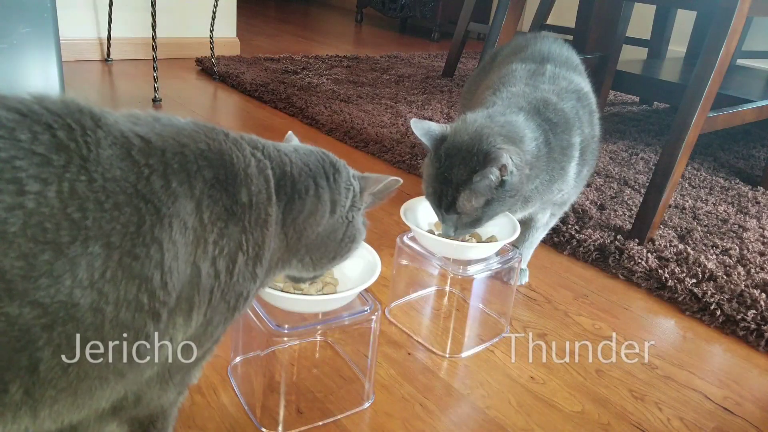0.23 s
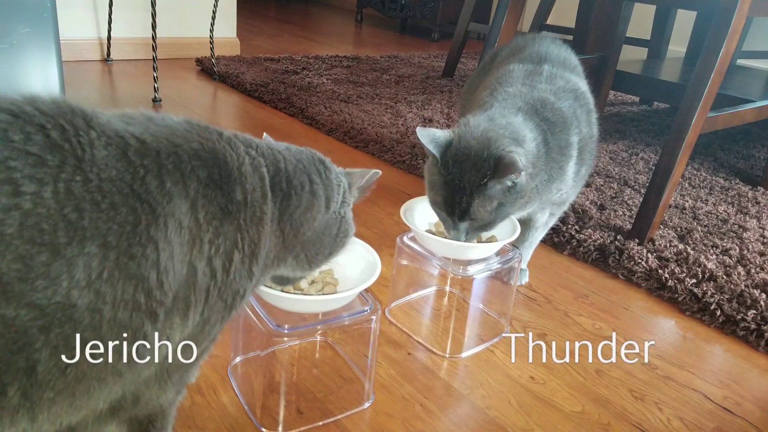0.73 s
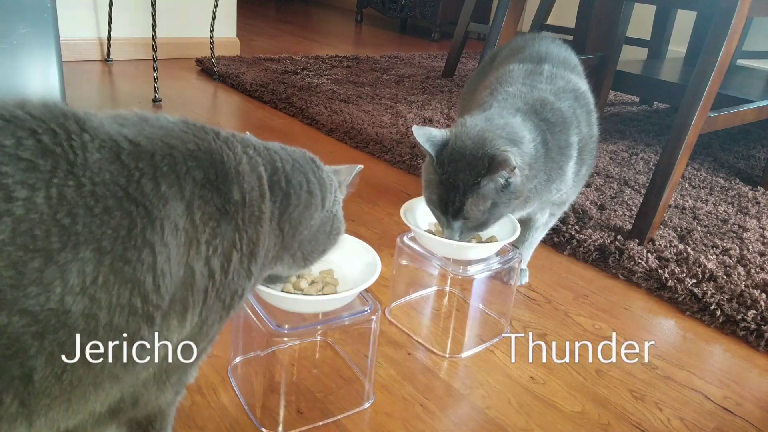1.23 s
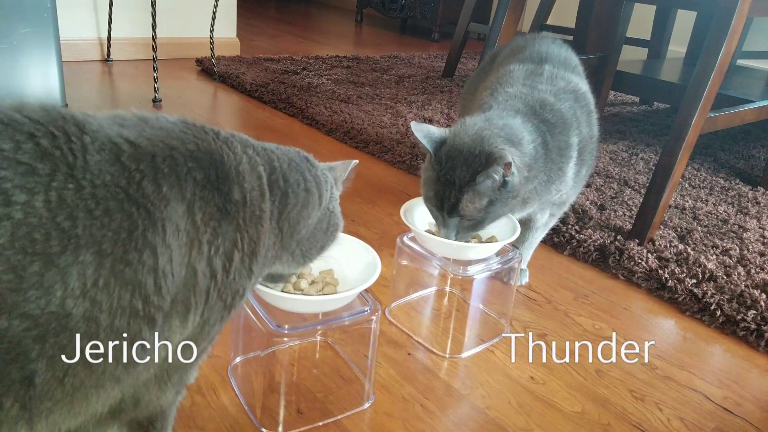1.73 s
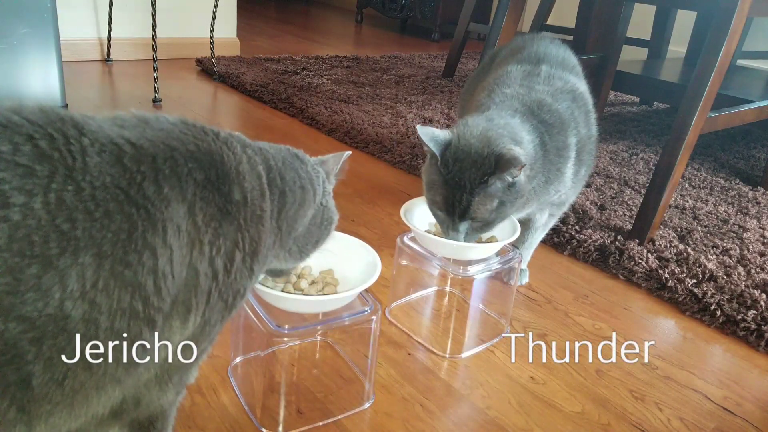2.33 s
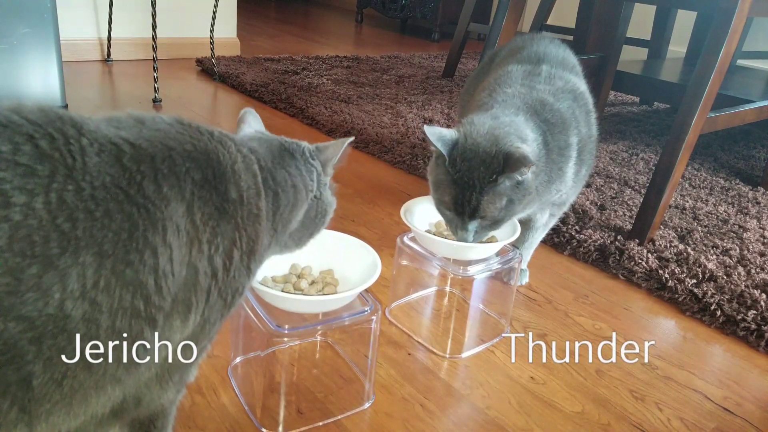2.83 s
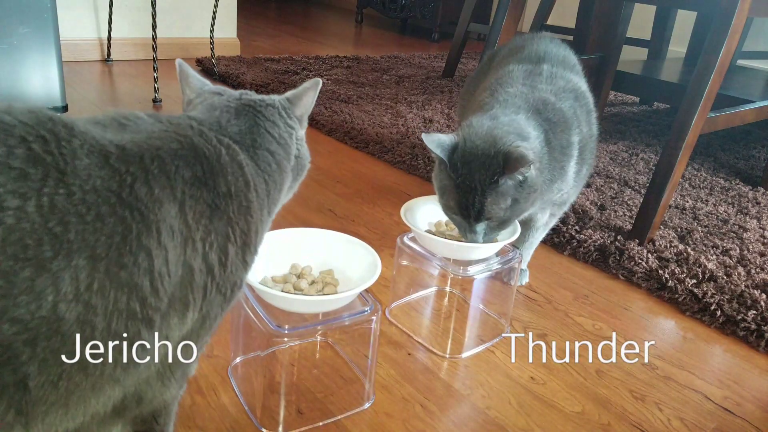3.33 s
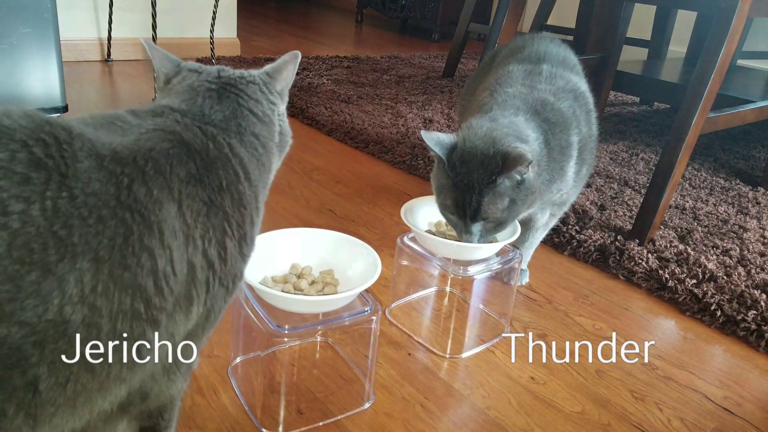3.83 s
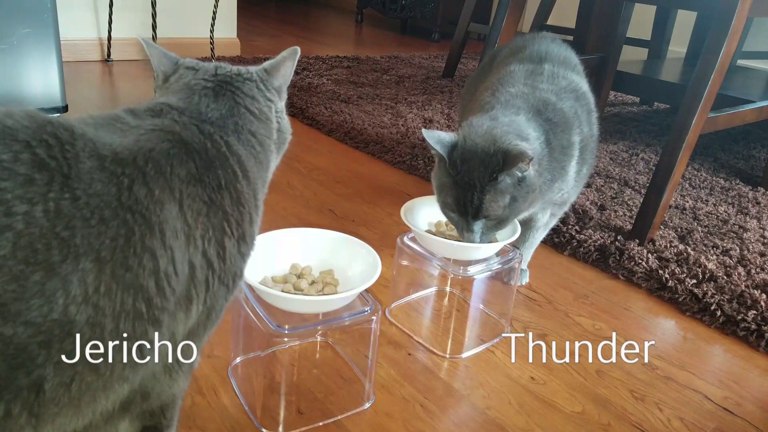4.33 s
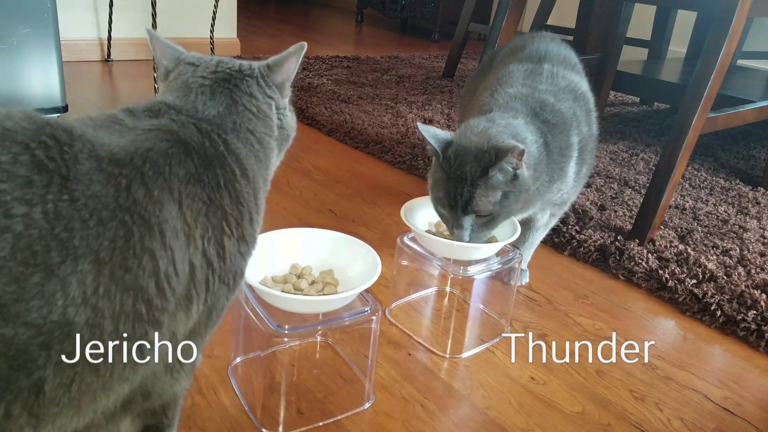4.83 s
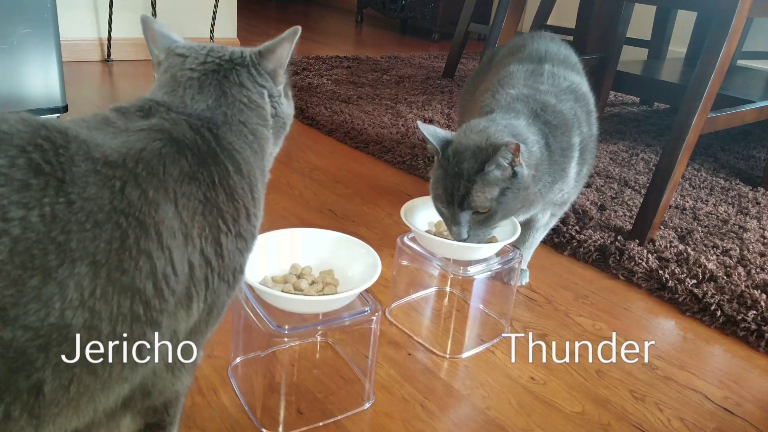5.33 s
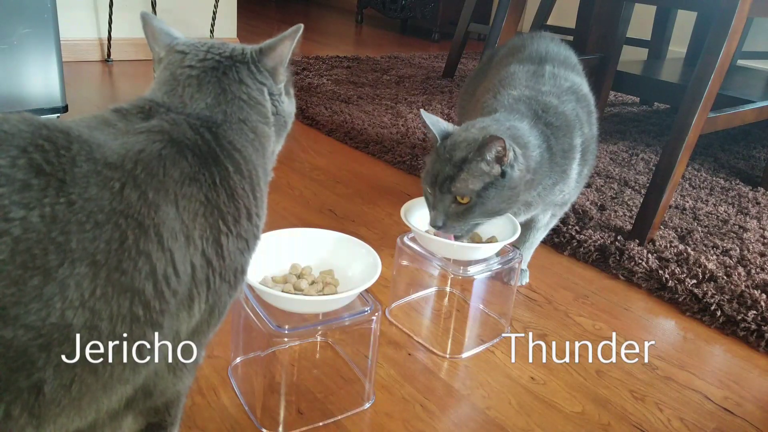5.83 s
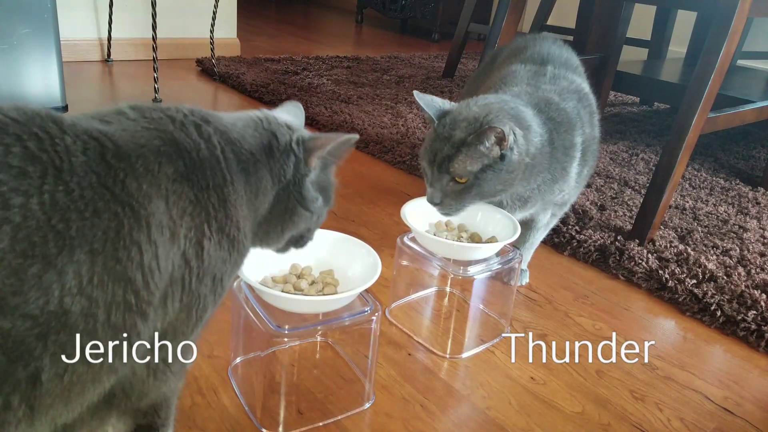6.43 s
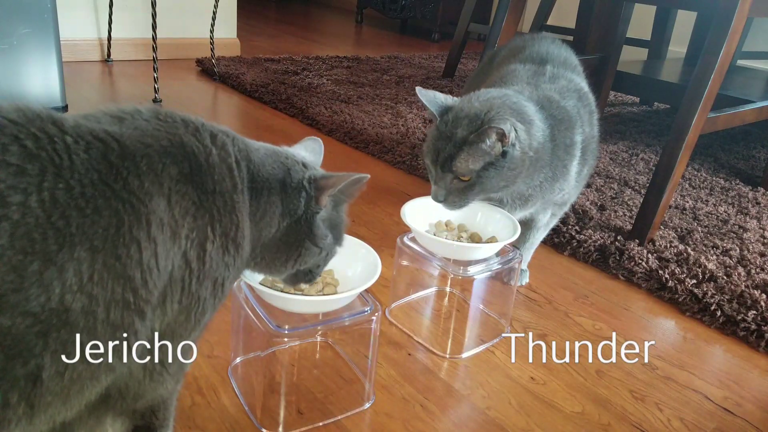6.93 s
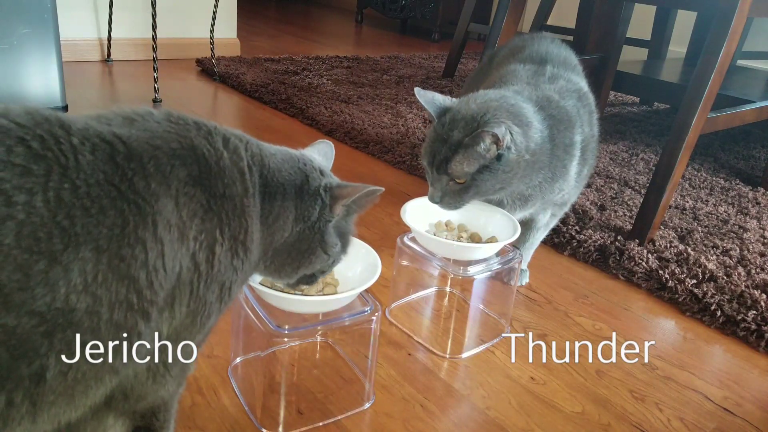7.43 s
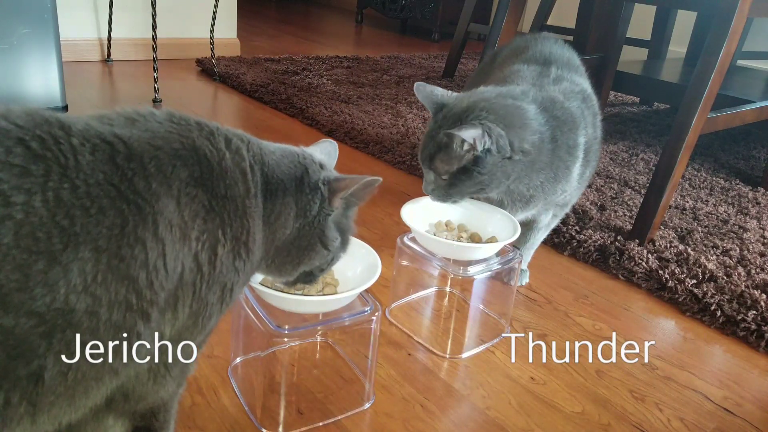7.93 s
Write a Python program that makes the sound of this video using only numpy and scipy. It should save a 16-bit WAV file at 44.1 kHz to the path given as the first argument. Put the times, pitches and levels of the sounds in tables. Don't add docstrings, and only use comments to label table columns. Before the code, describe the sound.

Quick irregular wet clicks of cats chewing close by, over a steady refrigerator hum and the faint ringing tick-tock of a clock.

```python
import sys
import numpy as np
from scipy import signal
from scipy.fft import irfft
from scipy.io import wavfile
from scipy.ndimage import uniform_filter1d

SR = 44100
rng = np.random.default_rng(int(sys.argv[2]) if len(sys.argv) > 2 else 0)


def file_out(sig):
    cols = np.atleast_2d(sig).T
    lim = np.clip(cols, -1, 1)
    pcm = np.round(lim * 32767).astype(np.int16)
    wavfile.write(sys.argv[1], SR, pcm)


def natural_amplitude(level_db):
    exponent = np.asarray(level_db, float) / 20
    return 10 ** exponent


N = 361179
T = np.arange(N) / SR


def evened(x):
    return x / np.sqrt(np.mean(x ** 2) + 1e-20)


def read(points, hz):
    f, value = np.transpose(points)
    return np.interp(np.log(hz + 1), np.log(f + 1), value)


def add(mix, s, sound):
    part = mix[:, round(s * SR):][:, :sound.shape[1]]
    part += sound[:, :part.shape[1]]


def panned(sound, lean_db):
    return sound * natural_amplitude([[lean_db / 2], [-lean_db / 2]])


def resonances(x, table):
    out = 0
    for hz, width, db in table:
        out = out + natural_amplitude(db) * signal.lfilter(*signal.iirpeak(hz, hz / width, SR), x)
    return out


# frequency in Hz, left-right correlation.
LIKENESS = [(60, 0.99), (130, 0.98), (290, 0.89), (630, 0.6), (1380, -0.06), (3030, 0.098), (6630, 0.016),
            (14500, 0.091)]
# frequency in Hz, left-right level in dB.
BALANCE = [(35, -2.3), (110, -5.5), (200, -0.5), (370, 0), (690, -1.5), (1270, 0.0), (2330, 0), (4290, 1),
           (7900, 2), (14500, 1.5)]
LAG_S = -0.00013


def noise(spectrum_db, size, patchy_db):
    hop, hz = size // 4, np.fft.rfftfreq(size, 1 / SR)
    a, b, c, d, patches = rng.standard_normal((N // hop + 5, len(hz), 5)).T
    patches = uniform_filter1d(patches, size=size // 80, axis=0)
    patches = evened(uniform_filter1d(patches, size=8192 // size, axis=1))
    same = np.clip(read(LIKENESS, hz), -1, 1)[:, None]
    left = a + 1j * b
    right = same * left + np.sqrt(1 - same ** 2) * (c + 1j * d)
    right = right * np.exp(2j * np.pi * hz * LAG_S)[:, None]
    lean_db = read(BALANCE, hz)[:, None] / 2
    z = np.array([left * natural_amplitude(lean_db), right * natural_amplitude(-lean_db)])
    z *= natural_amplitude(spectrum_db(hz)[:, None] + patchy_db * patches)
    return evened(signal.istft(z, nperseg=size, noverlap=size - hop)[1][:, :N])


# frequency in Hz, level in dB.
AIR = [(120, -47), (250, -4.5), (320, -3), (420, -3.5), (520, -7.5), (650, -12), (950, -14), (1250, -17),
       (1600, -18), (2100, -22.5), (3000, -27.5), (4300, -33), (6000, -44), (9000, -81)]
# frequency in Hz, level in dB.
RUMBLE = [(15, -35), (28, -15), (48, -4), (75, -3), (130, -1), (175, -2), (195, -8.5), (250, -5.5),
          (330, -23), (700, -82)]
# frequency in Hz, width in Hz, lift in dB.
STANDING_WAVES = [(37, 5.2, 7), (47.2, 2.3, -13), (55, 9.4, 5), (104, 2.74, 11.5), (159.7, 3.7, 5.5),
                  (218, 10, 3), (509, 33, 2.5), (796.6, 60, 8.5)]
AIR_DB, RUMBLE_DB = -56, -48.5


def house():
    def lift_db(hz):
        return sum(db * np.exp(-((hz - f) / width) ** 2) for f, width, db in STANDING_WAVES)

    rumble = noise(lambda hz: read(RUMBLE, hz) + lift_db(hz), size=8192, patchy_db=0.5)
    air = noise(lambda hz: read(AIR, hz) + lift_db(hz), size=1024, patchy_db=0.96)
    return natural_amplitude(RUMBLE_DB) * rumble + natural_amplitude(AIR_DB) * air


# frequency in Hz, left level in dB, right level in dB, left phase lead in radians.
HUM = (120, -43.5, -42, 0.15)
# frequency in Hz, left level in dB, right level in dB.
WHINE = [(235.5, -62.7, -64.0), (430.7, -69.9, -69.4), (562.6, -73.6, -80.0), (771.2, -77.6, -76.4),
         (1473.7, -82.4, -84.9), (1531.5, -81.4, -86.8), (1826.3, -90.5, -80.9), (1885.5, -79.5, -86.5),
         (3262.3, -89.2, -92.9), (3854.4, -94.3, -92.3), (4507.2, -89.2, -93.2), (4566.4, -85.5, -91.1),
         (4625.6, -102.6, -93.3), (4686.2, -98.2, -96.3), (4745.4, -87.8, -96.0), (4804.6, -96.9, -94.2),
         (4863.8, -94.2, -100.7), (5185.5, -88.9, -89.2), (6820.6, -97.8, -111.1), (6879.9, -100.0, -108.8),
         (11387.0, -99.7, -100.3), (11566.0, -99.1, -98.1), (11623.9, -94.0, -98.1),
         (11684.5, -99.4, -96.8), (11742.3, -94.5, -97.4), (11801.5, -106.9, -93.9),
         (11980.5, -96.6, -98.5), (12158.2, -99.8, -101.9)]


def refrigerator():
    hz, left_db, right_db, lead = HUM
    hum = natural_amplitude([[left_db], [right_db]]) * np.sin(2 * np.pi * hz * T + np.array([[lead], [0]]))
    bins = np.zeros((2, N // 2 + 1), complex)
    for hz, left_db, right_db in WHINE:
        at = round(hz * N / SR) + np.arange(-4, 5)
        cluster = np.exp(2j * np.pi * rng.random(len(at))) * natural_amplitude(-7 * abs(at - at.mean()))
        lag = np.array([[0], [min(hz / 500, 1.9)]])
        gains = natural_amplitude([[left_db - 2.5], [right_db - 2.5]])
        bins[:, at] += N / 2 * gains * cluster * np.exp(-1j * lag)
    return np.sqrt(2) * (hum + irfft(bins, N))


# frequency in Hz, decay time t60 in seconds.
DECAY = [(500, 0.31), (1000, 0.3), (2500, 0.25), (5000, 0.36), (10000, 0.13)]


def room(x):
    taps = np.zeros((2, SR // 2))
    at = np.arange(80, SR // 2 - 20, 20) + rng.integers(0, 20, (2, (SR // 2 - 81) // 20))
    np.put_along_axis(taps, at, rng.choice([-1., 1.], at.shape), 1)
    hz, t, z = signal.stft(taps, SR, nperseg=256)
    fade_db = -60 * t / read(DECAY, hz)[:, None]
    tail = signal.istft(z * natural_amplitude(fade_db), SR, nperseg=256)[1]
    return signal.oaconvolve(x, tail / np.linalg.norm(tail[0]), axes=1)[:, :N]


# frequency in Hz, width in Hz, level in dB.
SHELL = [(1154, 110, 9), (1700, 230, 4), (2310, 74, 4.5), (3380, 290, -5.5), (4140, 220, -9.5),
         (7160, 530, -17)]
FIRST_STEP_S, STEP_DB = 0.462, -69.0


def wall_clock():
    t, out, steps = T[:SR // 10], np.zeros((2, N)), np.arange(FIRST_STEP_S, N / SR, 1)
    shape = (len(steps), 2, len(t))
    rattle = rng.standard_normal(shape) * (rng.random(shape) < 900 / SR)
    arch = np.sin(np.pi * np.clip(t / 0.04, 0, 1)) ** 2
    for s, teeth in zip(steps, rattle):
        add(out, s, natural_amplitude(STEP_DB) * evened(resonances(teeth * arch, SHELL)))
    return out


# frequency in Hz, level on a tick in dB, level
# on a tock in dB, left-right level in dB, decay time t60 in seconds.
CLOCK_MODES = [(983, 0, -9, 0.5, 0.054), (1098, -1, -6.5, 0, 0.044), (1212, -3.5, 1.5, -3, 0.025),
               (1524, -3, -3.5, 3.5, 0.014), (1890, -4.5, -3, -11, 0.013), (2225, -7.5, -1, 11, 0.03),
               (2306, -13, -8, -9.5, 0.058), (2390, -6, -10, 9.5, 0.021), (2614, -7, -6, -11, 0.052),
               (2740, -6.5, -7, 7, 0.082), (2896, -4.5, -1, -3.5, 0.027), (3030, -6, -7, -4, 0.011),
               (3390, -9, -10, 4, 0.043), (3530, -11, -10, 5, 0.02), (3680, -11.5, -13.5, -5, 0.044),
         (4070, -19, -14, 0, 0.0091), (4680, -24, -15, 5, 0.011), (6260, -13, -16, 3, 0.0048),
         (8050, -12, -20, 7, 0.0036), (9300, -20, -18, 2, 0.0035), (10200, -16, -11, 4, 0.0036),
         (11600, -11, -6, 0, .003)]
# delay in seconds, left level in dB, right level in dB.
ECHOES = [(0, 4.5, 4), (.0022, 7.5, 3), (.0047, 3.5, -5.5), (.0085, -3.5, 9.5), (0.0143, -7.5, -14),
          (.0182, -3, 1.5), (.022, 1, -14)]
# first blow in seconds, period in seconds, strength in dB.
PALLETS = [
    (0.5034, 1.1106, -52.5),
    (0.9732, 1.1124, -54),
]
SHADOW_S, SHADOW_DB = 3.5, -2.5
BLOW_SPREAD_DB = 1.5


def clock():
    t = np.maximum(T[:SR // 8] - [[.0002], [0]], 0)
    out = np.zeros((2, N))
    for side, (first, period, pallet_db) in enumerate(PALLETS):
        modes = []
        for k, (hz, tick_db, tock_db, lean_db, t60) in enumerate(CLOCK_MODES):
            decay = natural_amplitude((tick_db, tock_db)[side] - 60 * t / t60)
            modes.append((-1) ** k * panned(decay * np.sin(2 * np.pi * hz * t), lean_db))
        modes = np.array(modes)
        for s in np.arange(first, N / SR, period):
            ring = np.tensordot(natural_amplitude(BLOW_SPREAD_DB * rng.standard_normal(len(modes))), modes, 1)
            heard_db = pallet_db - 2.0 + SHADOW_DB * (s > SHADOW_S)
            for delay, left_db, right_db in ECHOES:
                echo = natural_amplitude(heard_db) * natural_amplitude([[left_db], [right_db]]) * ring
                add(out, s + delay + .0005 * side, echo)
    return out


# frequency in Hz, width in Hz, level in dB.
MOUTH = [(905, 560, 2), (1700, 1050, 17), (2880, 1100, -3), (4300, 900, -11)]
# frequency in Hz, width in Hz, level in dB.
SPIT = [(7360, 3100, -7), (11300, 13000, 0)]
# start in seconds, rms level in dB, length in seconds, brightness in dB.
SQUELCHES = [(.24, -67, 0.13, -14), (1.274, -65, .06, -20), (1.443, -65, 0.059, -21),
             (1.81, -66.5, .06, -11), (2.27, -65, 0.075, -11), (2.45, -70, 0.046, -12),
             (2.58, -74, .05, -4), (3.26, -65, 0.056, -17), (3.45, -68, 0.046, -16),
             (3.798, -64.5, 0.062, -13), (3.96, -70, .04, -4), (4.262, -64.5, 0.072, -16),
             (4.45, -63.5, .06, -16), (4.806, -65.5, 0.066, -11), (5.255, -67, 0.066, -11),
             (5.44, -59.5, 0.072, -18), (5.802, -65.5, 0.05, -10), (6.282, -67, 0.083, -11),
             (6.458, -74, .05, -17), (6.83, -74, 0.049, -9), (7.356, -65, 0.034, -8),
             (7.456, -73, 0.041, -20), (7.795, -62, 0.11, -17)]


def squelches():
    happens = rng.random((2, N)) < 2500 / SR
    size = natural_amplitude(2.0 * np.minimum(rng.exponential(1, (2, N)), 5))
    clicks = size * happens * rng.choice([-1., 1.], (2, N))
    mouth, spit = evened(resonances(clicks, MOUTH)), evened(resonances(clicks, SPIT))
    out = np.zeros((2, N))
    for s, db, length, bright_db in SQUELCHES:
        bite = slice(round(s * SR), round((s + length) * SR))
        arch = np.sin(np.pi * np.clip((T[bite] - s) / length, 0, 1) ** 0.5) ** 2
        add(out, s, natural_amplitude(db) * arch * (mouth[:, bite] + natural_amplitude(bright_db) * spit[:, bite]))
    return out


# start in seconds, pop level in dB, cavity pitch in Hz,
# spit level in dB.
NEAR_POPS = [(0.2182, -59.5, 3507, -72), (0.229, -60, 2200, -80), (0.3153, -71, 4760, -73),
             (0.7124, -66, 2200, -73), (1.0264, -59, 2240, -70), (1.534, -67, 3507, -80),
             (2.434, -61, 2255, -86), (2.457, -65, 1700, -82), (2.877, -74, 4510, -76),
             (3.5045, -69, 4259, -71), (4.172, -61.5, 4420, -66), (4.2737, -59.5, 2004, -79),
             (4.2902, -67, 4760, -73), (5.0964, -77, 4510, -70), (5.1278, -66, 4009, -81),
             (5.8148, -74, 3507, -75), (7.3404, -55.5, 2800, -77), (7.3538, -60, 3257, -77),
             (7.375, -68, 3200, -76), (7.9429, -69, 2004, -76), (8.0297, -64.5, 3507, -68)]
# start in seconds, pop level in dB, cavity pitch in Hz,
# spit level in dB.
FAR_POPS = [(0.1055, -66, 2004, -66), (0.421, -59.5, 2450, -83), (0.4545, -68, 3257, -83),
            (0.4844, -67, 2255, -78), (0.7004, -71, 4760, -70), (2.4764, -74, 3507, -77),
            (2.487, -59, 1700, -82), (3.1032, -61, 2000, -81), (3.3604, -74, 2505, -68),
            (3.725, -57.5, 1503, -79), (4.4898, -63, 4259, -74), (4.613, -78, 4259, -69),
            (4.8081, -65, 3730, -79), (5.7639, -58.5, 2200, -71), (6.2947, -60.5, 2000, -78),
            (6.3136, -62, 2004, -72), (6.509, -54, 1500, -79), (7.361, -56.5, 1500, -76),
            (7.5982, -56.5, 1600, -72), (7.818, -65, 2500, -74), (7.832, -68, 3500, -75)]
NEAR_LEAN_DB, FAR_LEAN_DB = 4, -2.4
LOWER_PER_KHZ = 0.24
RISE_S, SMACK_DB = 0.00051, -9


def pops():
    t, out = T[:400], np.zeros((2, N))
    swell = t / RISE_S * np.exp(1 - t / RISE_S)
    for table, lean_db in ((NEAR_POPS, NEAR_LEAN_DB), (FAR_POPS, FAR_LEAN_DB)):
        grits = rng.standard_normal((len(table), len(t)))
        for (s, db, hz, spit_db), grit in zip(table, grits):
            lower = LOWER_PER_KHZ * hz / 1000 * np.sin(2 * np.pi * 0.455 * hz * t)
            body = np.sin(2 * np.pi * hz * t) + lower
            smack = natural_amplitude(SMACK_DB) * evened(resonances(grit, MOUTH))
            spit = evened(resonances(resonances(grit, SPIT), SPIT))
            pop = swell * (natural_amplitude(db + 6) * (body + smack) + natural_amplitude(spit_db + 4.5) * spit)
            add(out, s, panned(pop, lean_db))
    return out


def scene():
    far, near = clock() + wall_clock(), pops() + squelches()
    echoes = room(natural_amplitude(-3.0) * far + natural_amplitude(-8) * near)
    return far + near + echoes + house() + refrigerator()


def roll_off(x):
    return signal.sosfilt(signal.butter(12, 15130, fs=SR, output="sos"), x)


# frequency in Hz, level in dB.
HISS = [(1500, -11.5), (4000, -3.5), (5300, -3), (7000, -7), (8200, -5.5), (9500, -11.5), (10600, -7.5),
        (11600, -3), (14450, 0), (14570, -6), (14640, -60)]
HISS_DB = -71.5


def record(dry):
    settling_db = 5 * np.exp(-(T / 0.062) ** 2) + 3.2 * np.exp(-T / 0.49)
    hiss = natural_amplitude(HISS_DB + settling_db) * noise(lambda hz: read(HISS, hz), size=512, patchy_db=0.0)
    edge = signal.firwin(511, 14520, window=("kaiser", 9), fs=SR)
    limited = signal.oaconvolve(dry + hiss, edge[None], "same", axes=1)
    return roll_off(limited - .0006)


dry = scene()
out = record(dry)
file_out(out)
```